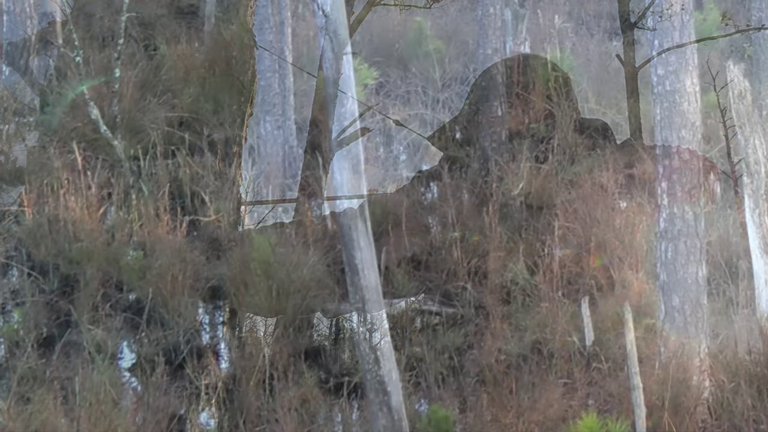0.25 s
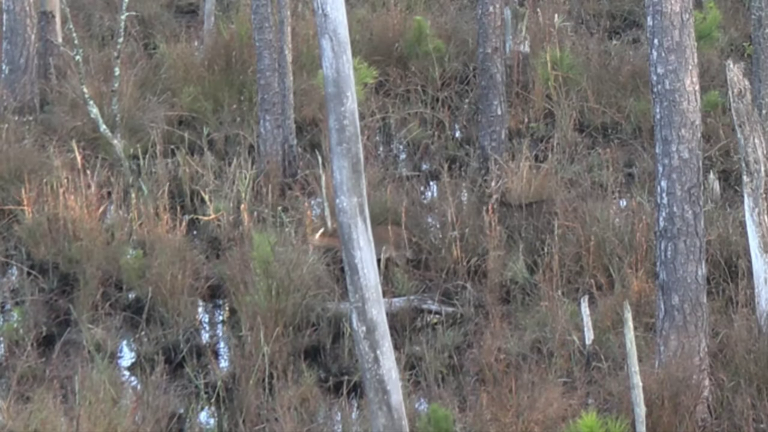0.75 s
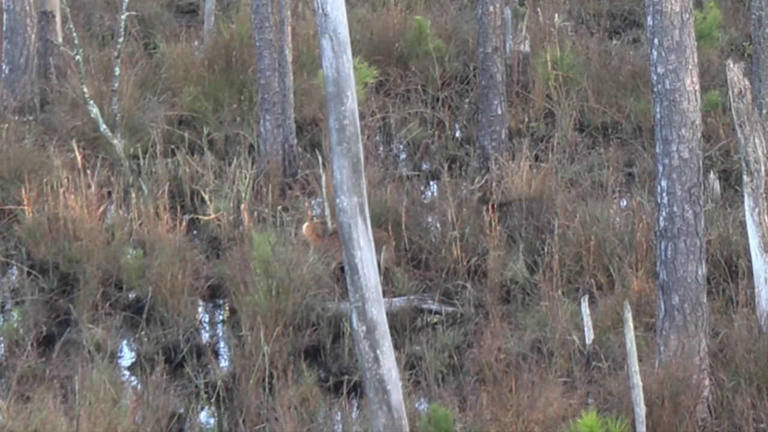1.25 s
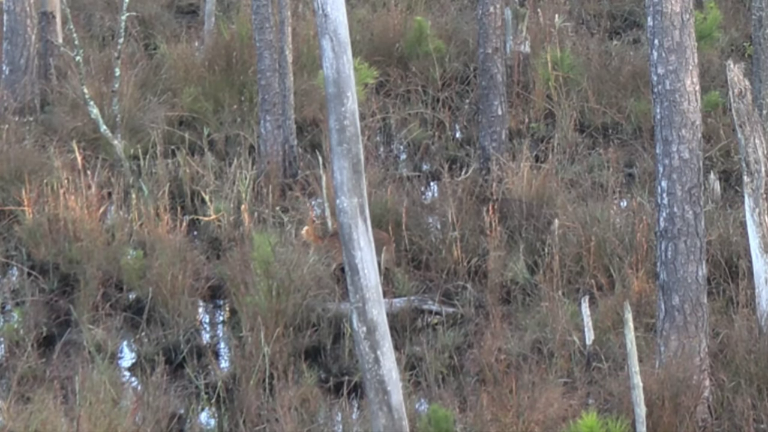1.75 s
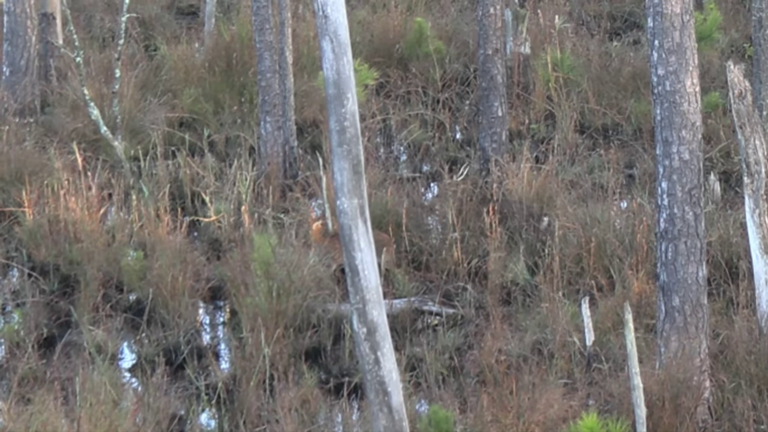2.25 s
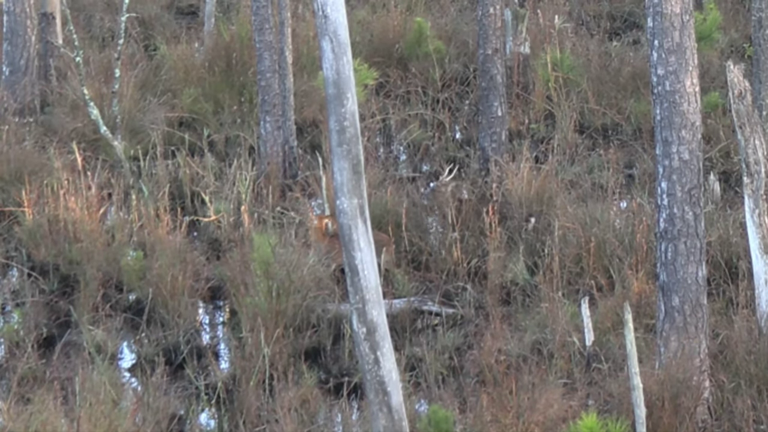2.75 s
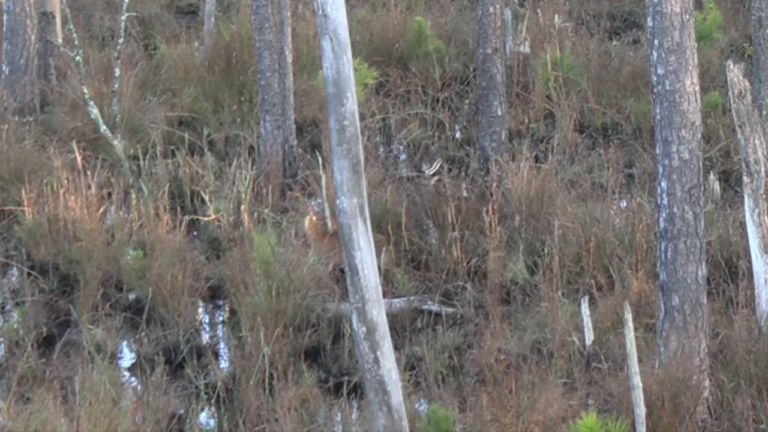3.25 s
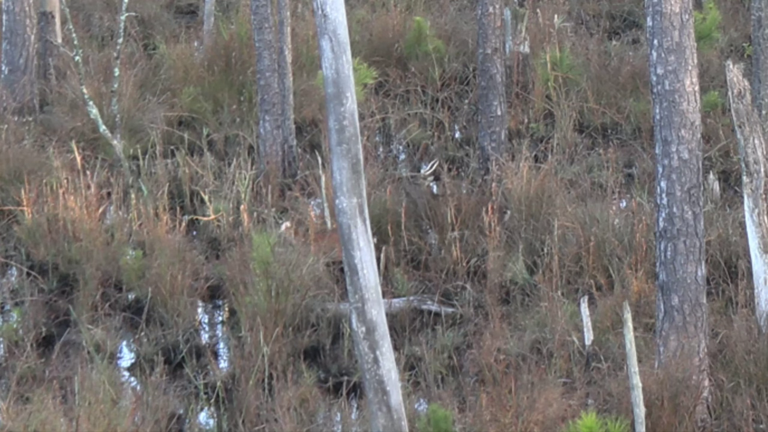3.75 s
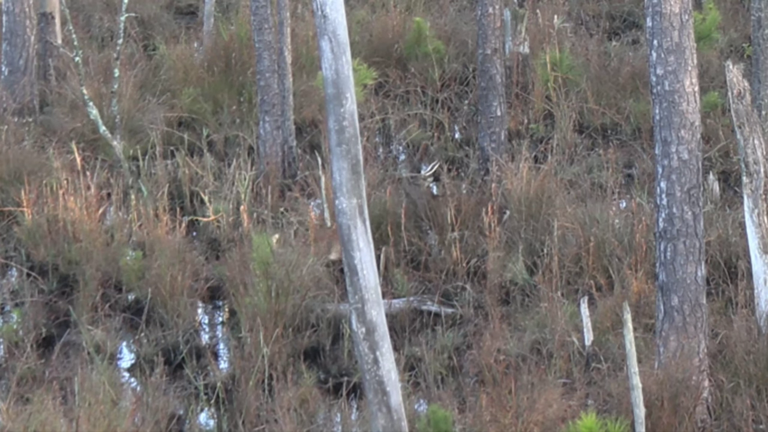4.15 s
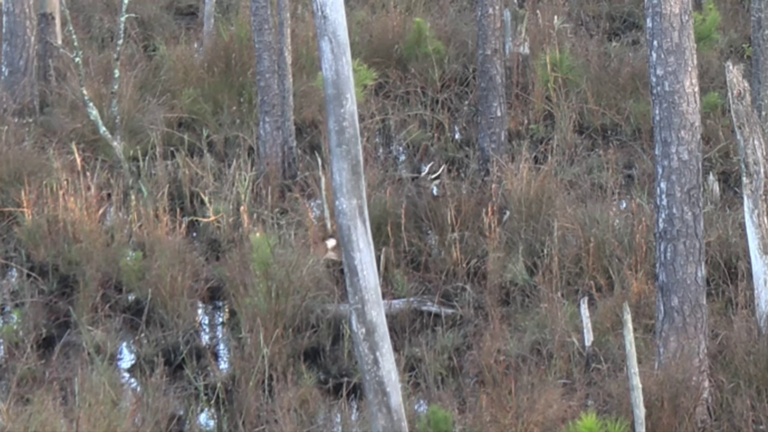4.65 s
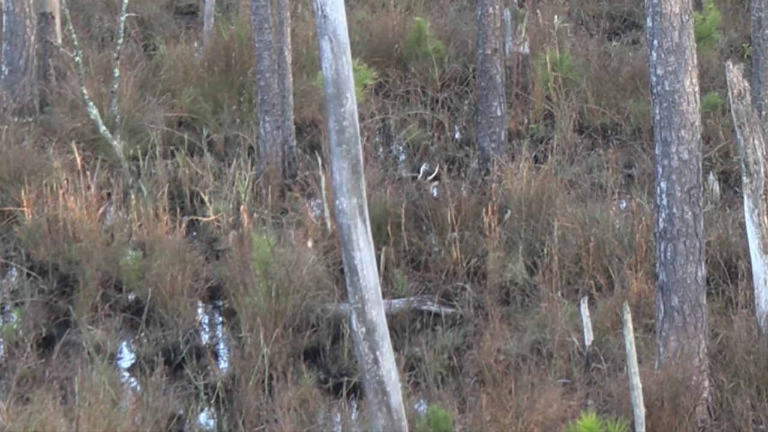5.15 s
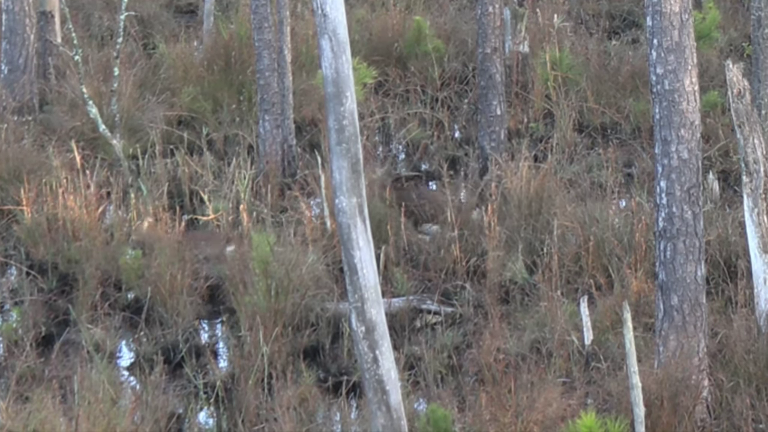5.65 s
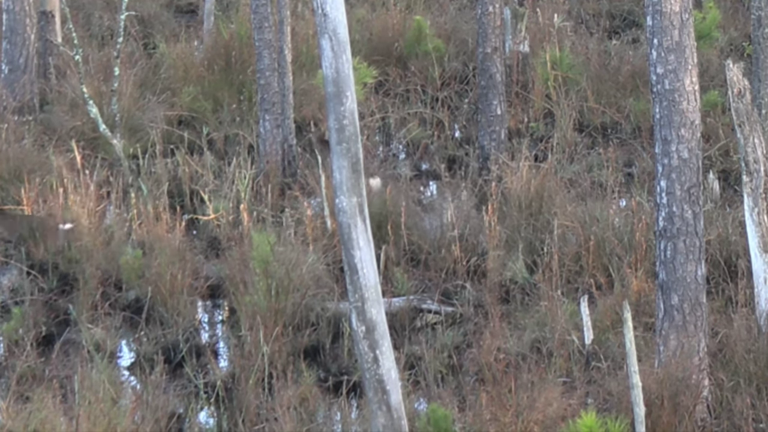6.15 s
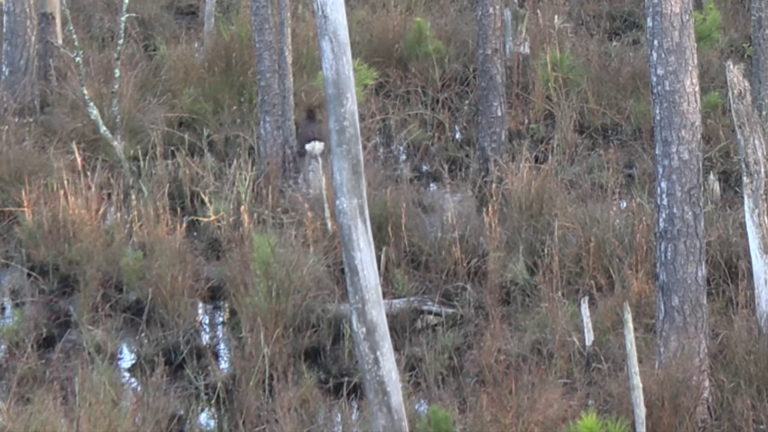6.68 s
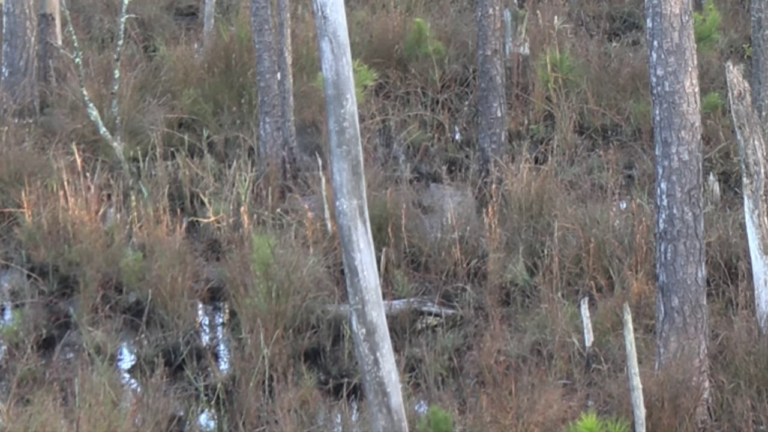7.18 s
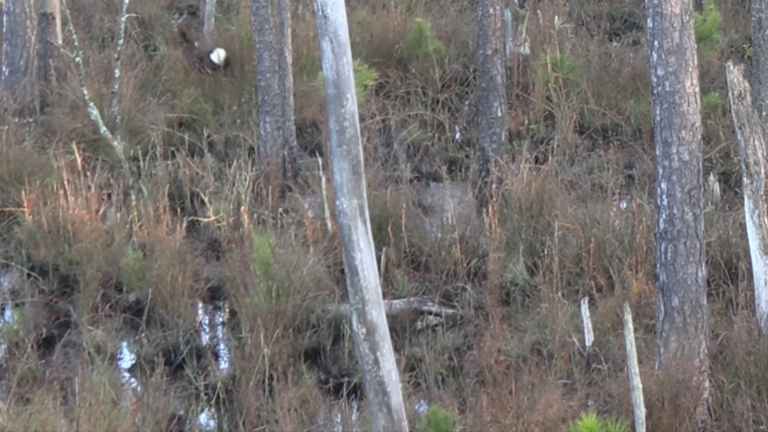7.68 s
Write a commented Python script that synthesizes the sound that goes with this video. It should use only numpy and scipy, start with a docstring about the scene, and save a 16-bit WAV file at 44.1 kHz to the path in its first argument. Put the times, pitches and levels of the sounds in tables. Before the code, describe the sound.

From 0 to 4.9 seconds, a quiet wet wood: very low wind rumble swelling in uneven gusts, soft airy hiss, barely ticking reeds. Small birds give thin high chips, strongest near 1.0, short falling chirps and hoarse little rasps, with a faint flock deeper in the trees. Tiny twig ticks and a small plop come around 0.7 to 1.5. At 4.89 light clicks lead into a bow shot close to the microphone at 4.91: a hard slap, rapid fluttering rattle, low string thrum and short metallic ringing, mostly gone by 5.2 with a woody echo. At 5.2 the arrow strikes with a crack; dry brush crackles, a sharp stick snaps at 5.39, and at 5.46 a heavy smack and plunge hits water. Until 8 seconds, a deer bounds away in irregular splashes, notably near 6.0, 6.5, 6.9 and 7.5, with bubbling churn, spray, snapping stems and hollow plops while wind continues.

```python
"""A bow is shot close by in a flooded pine wood: its string slaps and thrums, its frame rattles and rings.
An arrow strikes, sticks crack, and a deer tears through brush and bounds away through the shallows.
Small birds call over a low wind rumble and faintly ticking reeds. Shaped noise makes wind, rattle and spray;
sine waves make calls, ringing, cracks and bubbles. Echoes follow the birds, bow, sticks and water plops."""
import sys
import numpy as np
from scipy import signal
from scipy.fft import rfft, irfft, next_fast_len
from scipy.io import wavfile
from scipy.ndimage import uniform_filter1d, map_coordinates

SR = 44100
rng = np.random.default_rng(int(sys.argv[2]) if len(sys.argv) > 2 else 0)


def int16_out(signal):
    """Quantize to a 16-bit WAV file."""
    q = np.round(np.clip(np.atleast_2d(signal).T, -1, 1) * 32767)
    wavfile.write(sys.argv[1], SR, q.astype(np.int16))


N = 349076
TIME = np.arange(N) / SR  # seconds

# In all tables and settings, a "relative" level is shifted again where the layers are mixed.
# Slow gusts of wind. Each row: time in seconds, relative rumble level in dB.
WIND_GUSTS = [(0, -21.8), (0.5, -16.9), (0.85, -23.5), (1.05, -19.9), (1.9, -22.3), (2.3, -27.5),
              (2.9, -24.7), (3.9, -27.3), (4.85, -24.1), (5.1, -19.6), (5.55, -22.0), (6.1, -21.3),
              (6.7, -18.6), (7.0, -20.0), (7.55, -15.5), (7.9, -17.9)]
# Tone of the wind rumble. Each row: frequency in Hz, relative level in dB per Hz.
RUMBLE_TONE = [(3, -51), (7, -16), (9.5, 2.5), (13, -15.5), (18, 0), (23, -12.5), (34, -17.5), (41, -28),
               (52, -30), (80, -42.5), (200, -88)]
# Tone of the soft air in the wood. Each row: frequency in Hz, relative level in dB per Hz.
AIR_TONE = [(40, -3), (80, 0.5), (180, 0), (290, -8.5), (580, -14.5), (1450, -26), (2900, -28.5),
            (5000, -34), (8500, -37.5), (15500, -45.5)]
# Faint stirring in the reeds. Each row: time in seconds, relative level in dB.
REED_STIRRING = [(0, -60), (.55, -55.5), (1.55, -55), (1.8, -65.5), (3.9, -62), (4.85, -57)]
# Tone of the ticking reeds. Each row: frequency in Hz, relative level in dB per Hz.
REED_TONE = [(300, -10), (700, 4.5), (1700, 2.5), (3200, -0.5), (6000, -7.5), (9000, -17), (15000, -32)]

# High arched chips of a small bird. Each row: start in seconds, relative peak in dB, basic pitch in Hz.
BIRD_CHIPS = [(0.132, -35, 5540), (.625, -49.5, 5500), (1.034, -27, 5600), (2.831, -41, 5860),
              (3.765, -54, 6800), (4.249, -39.5, 5890), (4.378, -48, 5700)]
# Hoarse two-voiced calls. Each row: start in seconds, relative peak in dB, basic pitch in Hz.
BIRD_RASPS = [(.336, -41, 3880), (.39, -47, 3900), (0.874, -40.5, 3640), (3.282, -39.5, 3920),
              (3.472, -36.5, 3820), (4.518, -38.5, 4130), (4.763, -36, 3900), (4.805, -44, 3700)]
# Nearest falling chirps. Each row: time a fifth of the way in, in seconds, relative peak in dB, middle pitch in Hz.
BIRD_CHIRPS = [(0.241, -46, 2800), (.7701, -45.5, 2650), (1.0131, -42, 3120), (1.8796, -44, 3020),
               (1.992, -43, 2540), (2.3503, -44, 2850), (3.3987, -43.5, 2610), (4.063, -49, 2750),
               (4.4484, -42.5, 2830), (4.664, -46, 2680)]
# Softer chirps: middle pitch, its span as a share, then relative top level and span of level.
FLOCK_HZ, FLOCK_SPREAD, FLOCK_DB, FLOCK_RANGE_DB = 2720, 0.294, -45, 6.5
# The chips linger on one thin tone among the trees.
CHIP_RING_HZ, CHIP_RING_WIDTH_HZ, CHIP_RING_DB = 5750, 110, -8

# The deer tears out of the brush. Each row: time in seconds, level in dB.
BRUSH_BOLT = [(5.19, -76), (5.22, -47.5), (5.36, -43.5), (5.40, -58), (5.55, -70)]
# Tone of the dry twigs. Each row: frequency in Hz, relative level in dB per Hz.
TWIG_TONE = [(200, 3), (700, 1), (2200, -4), (2850, 3), (3600, -16), (5500, -8.5), (10000, -27),
             (15000, -21)]
# Arrow strike and breaking sticks.
# Each row: start in seconds, relative peak in dB, pitch in Hz, relative splinter level in dB.
STICK_CRACKS = [(1.1345, -40, 7200, 4), (1.189, -38.5, 2300, -11), (1.459, -36, 1730, -7),
                (5.198, -17, 1370, -7.5), (5.213, -30, 2980, -4), (5.2874, -27.5, 2820, -3),
                (5.368, -27, 2930, -5), (5.392, -8, 2750, -15), (5.3964, -18, 4720, -6),
                (5.445, -32.5, 3020, 9), (5.457, -24.5, 4900, 0), (5.474, -25, 2480, 4.5),
                (5.496, -28, 3130, 5)]
CRACK_T60_S = 0.017  # time to die away by 60 dB

# Largest pockets of air closing in the water.
# Each row: start in seconds, relative peak in dB, starting pitch in Hz, time to fall 60 dB in seconds.
WATER_PLOPS = [(0.699, -42, 1920, 0.035), (1.1562, -25, 930, 0.021), (5.416, -26, 1190, 0.056),
               (5.4615, -10, 360, 0.018), (5.4662, -3, 590, 0.0073), (5.4671, -17, 1170, 0.021),
               (5.982, -30.5, 610, .06), (6.398, -19.5, 635, 0.035), (6.408, -24, 564, 0.054),
               (6.506, -27.5, 503, 0.11), (6.5755, -23, 624, 0.042), (6.662, -30, 1060, 0.042),
               (7.24, -32, 780, 0.047), (7.6, -31, 805, 0.037)]
PLUNGE_S = 5.461  # the deer's first leap hits the water
# Tone of the noise in churning water. Each row: frequency in Hz, relative level in dB per Hz.
CHURN_TONE = [(90, -17), (250, -2), (550, -2), (1000, -2.5), (1700, -6.5), (2600, -15.5), (5000, -34.5)]
# Tone of spray, splinters and stems. Each row: frequency in Hz, relative level in dB per Hz.
SPRAY_TONE = [(700, 2.5), (1900, 1.5), (3000, 1.5), (5000, -1), (6600, -7.5), (8300, -4.5), (10300, -22.5),
              (13000, -17), (15500, -37)]
# Tone of the body meeting the water. Each row: frequency in Hz, relative level in dB per Hz.
THUMP_TONE = [(50, -8), (150, 1), (500, -1), (1300, 0), (2500, -29)]
# Tone of small stems breaking. Each row: frequency in Hz, relative level in dB per Hz.
SNAP_TONE = [(1500, -6), (5000, 1), (8500, -1.5), (15000, -7)]
# Bounds through the shallows. Each row: start in seconds, relative churn level in dB, relative spray level in dB.
DEER_BOUNDS = [(5.79, -50, -37.5), (5.98, -37, -43), (6.16, -44, -44), (6.35, -42, -44.5),
               (6.471, -34, -37.5), (6.89, -32.5, -40.5), (7.099, -42, -42.5), (7.40, -59, -43.5),
               (7.529, -40, -40)]
SPRAY_RISE_S, SPRAY_T60_S = 0.013, 0.47  # each bound throws up spray
CHURN_LAG_S, CHURN_RISE_S, CHURN_T60_S = 0.019, 0.022, 0.84  # then the water closes behind the legs
# Disturbed water between bounds. Each row: time in seconds, relative churn level in dB, spray level in dB.
WATER_WAKE = [(5.5, -32.5, -36), (5.65, -35, -45), (5.92, -40.5, -43), (6.62, -42, -46), (6.76, -46, -50),
              (6.87, -45.5, -44), (7.05, -40, -47), (7.33, -45, -53), (7.66, -45, -46), (7.9, -47, -50)]

RELEASE_S = 4.908  # the string reaches its stop
# Release clicks and the arrow sliding off. Each row: start in seconds, relative level in dB.
LET_OFF_CLICKS = [(4.891, -36), (4.901, -26), (4.906, -22)]
SLAP_S, SLAP_DB, SLAP_T60_S = 4.9118, -9.5, 0.023  # first hard slap: start, relative level, decay
# Later slaps: spacing, relative level, loss times swing number squared, decay.
SWING_S, SWING_DB, SWING_LOSS_DB, RATTLE_T60_S = .0098, -18, 0.13, .04
# Tone of the rattling bow. Each row: frequency in Hz, relative level in dB per Hz.
RATTLE_TONE = [(880, -15), (1500, -5), (1950, -10.5), (2200, -1), (2280, -10), (2800, -9.5), (3610, -7),
               (5560, -8.5), (6130, -11), (8050, -10), (15500, -29.5)]
# Tone of the limbs and riser, the bow's frame. Each row: frequency in Hz, relative level in dB per Hz.
FRAME_TONE = [(80, -6), (160, 3.5), (235, -4), (300, 2), (460, -3), (600, -0.5), (700, -11), (850, -3),
              (1000, 2.5), (1080, -9), (1320, -6), (1700, -13), (2300, -12), (4000, -26.5)]
# Ringing fittings. Each row: pitch in Hz, relative level in dB, time to fall 60 dB in seconds.
FITTING_RINGS = [(398, -16, 0.18), (507, -8, .15), (845, -2, 0.17), (1306, -1.5, 0.21), (1500, 0, 0.22),
                 (1803, -1, 0.15), (2143, 4, 0.19), (2520, 0, .15), (3620, 3, 0.09), (6701, -5, .13),
                 (8100, -14, .14)]
# String and the limbs that swing with it. Each row: pitch in Hz, relative level in dB.
STRING_TONES = [(100, -1), (163, -7), (198, -4.5), (300, -11)]

# Echo among the trunks. Each row: frequency in Hz, time to fall 60 dB in seconds.
WOOD_ECHO = [(100, 0.82), (500, 2), (3000, 1.2), (8000, 0.67), (15000, 0.8)]
# Stereo width of the whole scene. Each row: frequency in Hz, side level in dB.
SCENE_WIDTH = [(30, -67), (120, -39), (2000, -61), (5000, -54), (9000, -24), (14000, -17)]
# The close bow sounds wider. Each row: frequency in Hz, relative side level in dB.
BOW_WIDTH_TONE = [(60, -29), (180, -29), (550, -27), (1650, -48), (4970, -25), (15000, -14)]
TOP_HZ = 15750  # nothing sounds above this


def amp(db):
    """Turn decibels into a gain."""
    return 10 ** (np.asarray(db) / 20)


def unit(x):
    """Scale to an average (rms) strength of 1."""
    return x / np.sqrt(np.mean(x ** 2) + 1e-20)


def along(points, hz):
    """Read values between (Hz, value) points, with frequency on a log scale."""
    f, v = np.transpose(points)
    return np.interp(np.log(hz + 1), np.log(f + 1), v)


def curves(rows):
    """Give one value per sample for each column after the time."""
    s, *cols = np.transpose(rows)
    return [np.interp(TIME, s, c) for c in cols]


def wobble(rate):
    """Draw a smooth random curve with rate knots a second."""
    knots = rng.standard_normal(int(N * rate / SR) + 4)
    return map_coordinates(knots, [TIME * rate])


def filtered(x, response):
    """Multiply the spectrum of x by a response that depends on frequency."""
    m = next_fast_len(N + SR // 2)
    spectrum = rfft(x, m) * response(np.fft.rfftfreq(m, 1 / SR))
    return irfft(spectrum, m)[..., :N]


def coloured(x, spectrum):
    """Filter x by a tone table, then bring it to rms 1."""
    return unit(filtered(x, lambda hz: amp(along(spectrum, hz))))


def noise(spectrum):
    """Make noise of rms 1 with the given tone."""
    return coloured(rng.standard_normal(N), spectrum)


def fade(t, t60, attack):
    """Rise at t = 0, then decay exponentially, by 60 dB in each t60."""
    t = np.maximum(t, 0)
    return (1 - np.exp(-t / attack)) * np.exp(-np.log(1000) * t / t60)


def add(track, s, sound):
    """Mix a sound into the track at s seconds."""
    part = track[max(round(s * SR), 0):][:len(sound)]
    part += sound[:len(part)]


def ticks(rate, spread_db):
    """Scatter random impulses of uneven size, about rate a second."""
    hits = rng.random(N) < rate / SR
    signs = rng.choice([-1, 1], N)
    return hits * signs * amp(spread_db * np.clip(rng.standard_normal(N), -2, 2))


def bubbles(pitch_hz, spread, cycles, rise, count):
    """Make a cloud of bubbles, each a dying sine wave whose pitch climbs."""
    start, size, tune = rng.random(count), rng.exponential(size=count), rng.standard_normal(count)
    t = np.arange(SR // 20) / SR
    turns = pitch_hz * np.exp(spread * tune)[:, None] * t
    tones = np.sin(2 * np.pi * turns * (1 + rise * turns / cycles))
    waves = np.minimum(size, 3)[:, None] * fade(turns, cycles, 0.5) * tones
    index = (start * N).astype(int)[:, None] + np.arange(len(t))
    return unit(np.bincount(index.ravel(), waves.ravel(), N)[:N])


def echo(x):
    """Trunks scatter the sound's energy into a diffuse tail, longest near 500 Hz."""
    hz, t, z = signal.stft(x, SR, nperseg=256)
    decay = fade(t[t < 2], along(WOOD_ECHO, hz)[:, None], 0.011) ** 2
    decay = decay / decay.sum(1, keepdims=True)
    power = signal.fftconvolve(np.abs(z) ** 2, decay, axes=1)[:, :len(t)]
    # random noise carries the smeared energy
    grain = signal.stft(rng.standard_normal(N), SR, nperseg=256)[2]
    tail = np.sqrt(np.abs(power)) * grain / grain.std()
    return signal.istft(tail, SR, nperseg=256)[1][:N]


def scatter(x, t60):
    """Smear a sound over many random short paths, as nearby stems do."""
    t = np.arange(SR // 4) / SR
    paths = rng.standard_normal(len(t)) * fade(t, t60, 0.00027)
    return signal.fftconvolve(x, paths / np.linalg.norm(paths))[:N]


def whistle(pitch, u):
    """Sing a smooth note on a pitch curve in Hz; u runs from 0 to 1."""
    return np.sin(np.pi * u) * np.sin(2 * np.pi * np.cumsum(pitch) / SR)


def wind():
    """Gusts swell a low noise rumble at the microphone, over the soft air of the wood."""
    rumble_db, = curves(WIND_GUSTS)
    rumble = noise(RUMBLE_TONE)
    # even out the noise so that the gusts alone set its strength
    rumble = rumble / np.sqrt(np.abs(uniform_filter1d(rumble ** 2, size=SR // 3)) + 1e-6)
    air = amp(-47 + 0.22 * wobble(2.86)) * noise(AIR_TONE)
    return amp(rumble_db + 1.0) * rumble + air


def reeds():
    """Stems tick faintly: filtered random clicks whose level flutters."""
    stir_db, = curves(REED_STIRRING)
    flutter_db = 2.2 * wobble(20)
    return amp(stir_db - 2 + flutter_db) * coloured(ticks(rate=3000, spread_db=7.0), REED_TONE)


def birds():
    """Chips arch in pitch, chirps plunge, and a second voice roughens the hoarse calls."""
    chips, chirps, rasps, far = np.zeros((4, N))

    u = np.linspace(0, 1, int(.036 * SR))
    for s, db, hz in BIRD_CHIPS:
        waver = 0.03 * np.sin(2 * np.pi * (3.43 * u + rng.random()))
        waver = waver + 0.093 * rng.standard_normal(len(u))
        arch = 1.03 - .5 * (u - .42) ** 2
        add(chips, s, amp(db - 4.0) * whistle(hz * (arch + waver), u))

    u = np.linspace(0, 1, int(0.029 * SR))
    for s, db, hz in BIRD_RASPS:
        second_voice = np.sin(2 * np.pi * np.cumsum(rng.normal(650, 2480, len(u))) / SR)
        pitch = hz * (.85 + 0.304 * u + 0.23 * second_voice)
        add(rasps, s, amp(db - 3.5) * whistle(pitch, u))

    u = np.linspace(0, 1, int(0.01013 * SR))
    fall = np.exp(0.638 * (.5 - u))
    for s, db, hz in BIRD_CHIRPS:
        add(chirps, s - len(u) / SR / 5, amp(db + 1.5) * whistle(hz * fall, u))
    for when, size, tune in rng.random((24, 3)):  # softer chirps at random times
        hz = FLOCK_HZ * (1 + FLOCK_SPREAD * (tune - .5))
        add(chirps, when * N / SR, amp(FLOCK_DB - FLOCK_RANGE_DB * size) * whistle(hz * fall, u))
    for when, size, tune in rng.random((110, 3)):  # the rest of the flock, deep in the wood
        hz = 2400 + 3000 * tune ** 2
        add(far, when * N / SR, amp(-44.0 - 12.0 * size) * whistle(hz * fall, u))

    near = chips + chirps + rasps
    lingering = filtered(echo(chips), lambda hz: np.exp(-((hz - CHIP_RING_HZ) / CHIP_RING_WIDTH_HZ) ** 2))
    calls = amp(CHIP_RING_DB) * lingering + amp(-2.5) * near
    smeared = amp(-6.5) * scatter(near, t60=0.12) + amp(-2.0) * scatter(far, t60=0.18)
    return calls + smeared + amp(-16) * echo(near)


def brush():
    """Dry twigs crackle in many small clicks as the deer bolts."""
    bolt_db, = curves(BRUSH_BOLT)
    moving = (TIME > BRUSH_BOLT[0][0]) & (TIME < BRUSH_BOLT[-1][0])
    return moving * amp(bolt_db) * coloured(ticks(rate=2200, spread_db=4), TWIG_TONE)


def sticks():
    """Wood rings unevenly for a moment under a burst of splinter noise."""
    track, splinters = np.zeros((2, N))
    t = np.arange(SR // 10) / SR
    for s, db, hz, splinter_db in STICK_CRACKS:
        shape = amp(db + 1.5) * fade(t, CRACK_T60_S, 0.0003)
        drift = 0.11 * np.cumsum(rng.standard_normal(len(t)))  # tearing fibres disturb the ring
        add(track, s, shape * np.sin(2 * np.pi * hz * t + drift))
        add(splinters, s, shape * amp(splinter_db))
    track = track + splinters * amp(-1.5) * noise(SPRAY_TONE)
    return track + amp(-19) * echo(track)


def plops():
    """Air trapped under the water, as by hooves, rings briefly with a rising pitch."""
    track, t = np.zeros(N), np.arange(SR // 8) / SR
    for s, db, hz, t60 in WATER_PLOPS:
        ring = np.sin(2 * np.pi * hz * t * (1 + 0.051 * t / t60))
        add(track, s, amp(db + 3.5) * fade(t, t60, 0.00048) * ring)
    return track + amp(-12.5) * echo(track)


def splashing():
    """A hard plunge, then bubbles churn and spray falls at each bound while stems snap."""
    wake_churn_db, wake_spray_db = curves(WATER_WAKE)
    churn_power, spray_power = amp(wake_churn_db) ** 2, amp(wake_spray_db) ** 2
    for s, churn_db, spray_db in DEER_BOUNDS:
        churn_swell = amp(churn_db) * fade(TIME - s - CHURN_LAG_S, CHURN_T60_S, CHURN_RISE_S)
        spray_swell = amp(spray_db + 3) * fade(TIME - s, SPRAY_T60_S, SPRAY_RISE_S)
        churn_power = churn_power + churn_swell ** 2
        spray_power = spray_power + spray_swell ** 2
    running = np.clip((TIME - PLUNGE_S) / 0.023, 0, 1)  # silent until the plunge

    froth = bubbles(pitch_hz=762, spread=.55, cycles=26, rise=0.055, count=2200)
    froth = coloured(froth, [(150, -7.0), (500, -2.0), (1100, -0.5), (4000, -10)])
    gulps = bubbles(pitch_hz=614, spread=0.31, cycles=26, rise=0.044, count=160)
    churn = unit(froth + amp(1.5) * noise(CHURN_TONE) + amp(-6) * gulps)
    drops = coloured(ticks(rate=2500, spread_db=2) * amp(1.9 * wobble(60)), SPRAY_TONE)
    stems = unit(scatter(coloured(ticks(rate=45, spread_db=5), SPRAY_TONE), t60=0.019))
    snaps = unit(scatter(coloured(ticks(rate=13, spread_db=6), SNAP_TONE), t60=0.014))

    smack = amp(-11.5) * fade(TIME - PLUNGE_S, 0.031, .001) * noise(THUMP_TONE)
    spout_noise = amp(-24.5) * noise(SPRAY_TONE) + amp(-28) * noise(CHURN_TONE)
    spout = fade(TIME - PLUNGE_S, 0.21, 0.00088) * spout_noise
    water = amp(1.5) * np.sqrt(churn_power) * churn
    spray = np.sqrt(spray_power) * (drops + amp(-6) * stems)
    return smack + spout + running * (water + spray + amp(-59.5) * snaps)


def bow():
    """The string thrums against its stop; its slaps rattle the bow, and frame and fittings ring."""
    t = np.maximum(TIME - RELEASE_S, 0)
    swings = [(SLAP_S + k * SWING_S, SWING_DB - SWING_LOSS_DB * k ** 2) for k in range(1, 8)]
    slaps = amp(SLAP_DB) * fade(TIME - SLAP_S, SLAP_T60_S, 0.00042)
    for s, db in list(LET_OFF_CLICKS) + swings:
        slaps = slaps + amp(db) * fade(TIME - s, RATTLE_T60_S, 0.00045)
    rattle = amp(0.5) * slaps * noise(RATTLE_TONE)

    damper = 1 / (1 + (t / 0.091) ** 8)  # the rubber stop chokes the last swings
    frame = amp(-8.5) * fade(t, 0.22, 0.013) * damper * noise(FRAME_TONE)
    ring = np.zeros(N)
    for hz, db, t60 in FITTING_RINGS:
        ring += amp(db) * fade(t, t60, 0.0079) * np.sin(2 * np.pi * (hz * t + rng.random()))
    thrum = sum(amp(db) * np.sin(2 * np.pi * hz * t) for hz, db in STRING_TONES)
    string = -amp(-7.5) * fade(t, 0.17, 0.0037) * damper * thrum
    clatter = rattle + frame
    return clatter + amp(-22) * ring + string + amp(-16.5) * echo(clatter)


def scene():
    """Every sound is heard nearly centred, with a faint side signal and soft independent hiss on each channel."""
    shot = bow()
    mid = wind() + reeds() + birds() + brush() + sticks() + plops() + splashing() + shot
    # the side signal is added on one channel and taken away on the other
    side = filtered(scatter(mid, t60=0.096), lambda hz: amp(along(SCENE_WIDTH, hz)))
    side = side + filtered(scatter(shot, t60=0.012), lambda hz: amp(along(BOW_WIDTH_TONE, hz) - 6))
    hiss = amp(-69.5) * rng.standard_normal((2, N))
    return np.array([mid + side, mid - side]) + hiss


def record(dry):
    """Round off the highest peaks smoothly, then remove everything from TOP_HZ up."""
    rounded = dry / (1 + (dry / .78) ** 6) ** (1 / 6)
    return filtered(rounded, lambda hz: hz < TOP_HZ)


dry = scene()
out = record(dry)
int16_out(out)
```